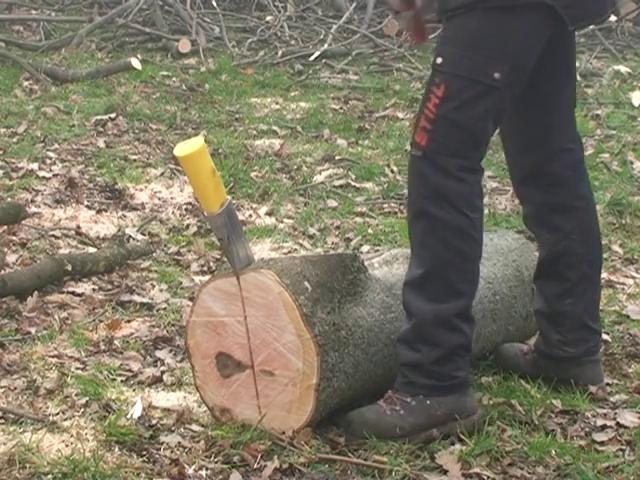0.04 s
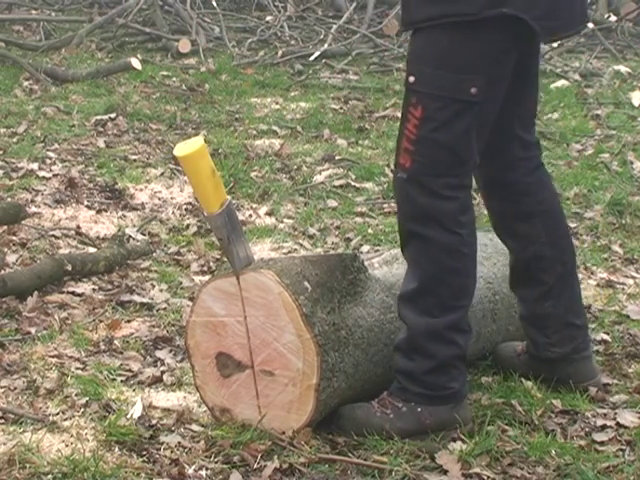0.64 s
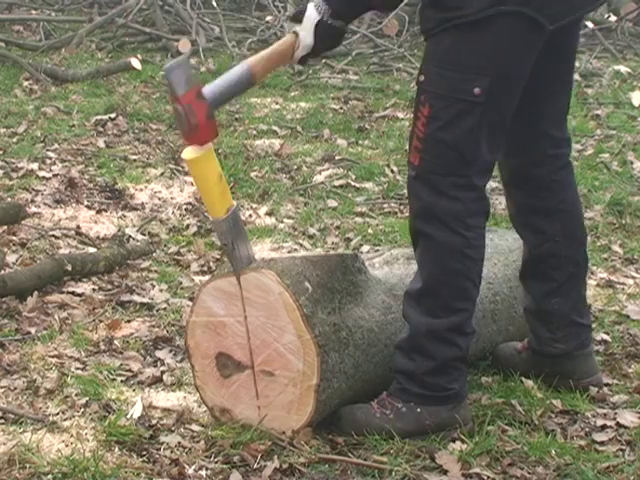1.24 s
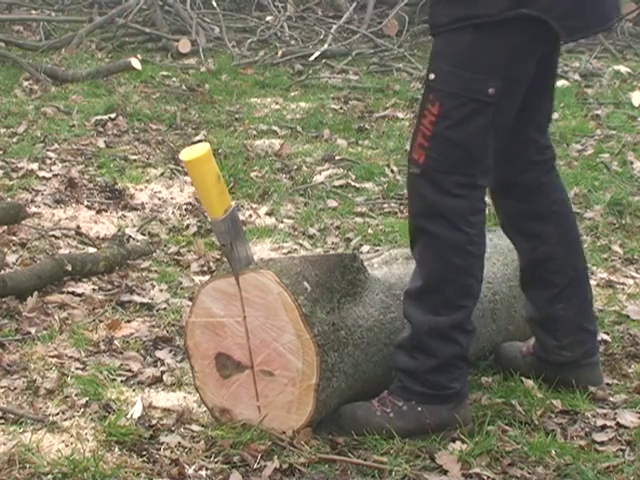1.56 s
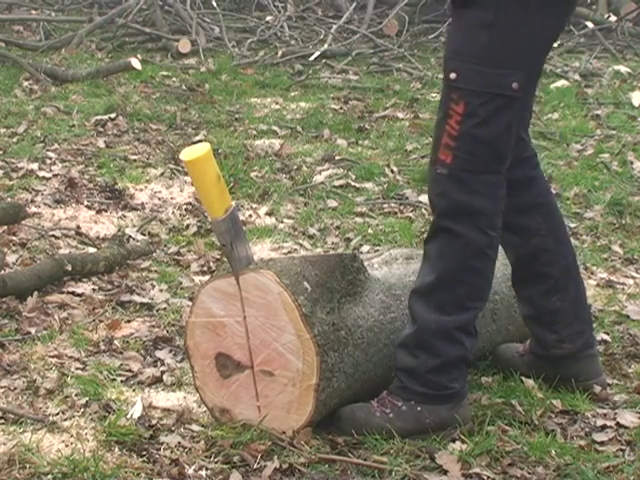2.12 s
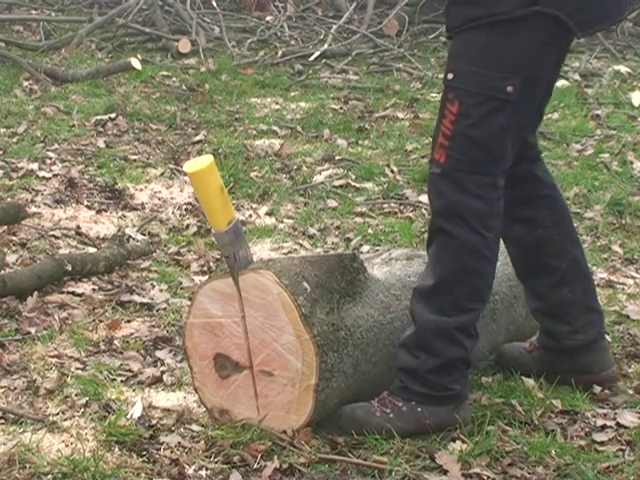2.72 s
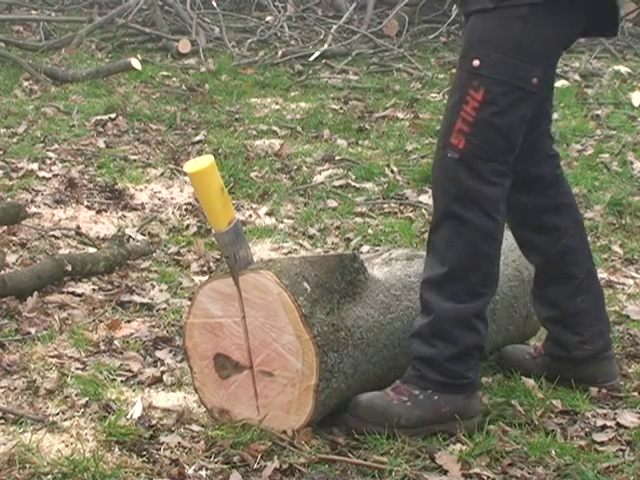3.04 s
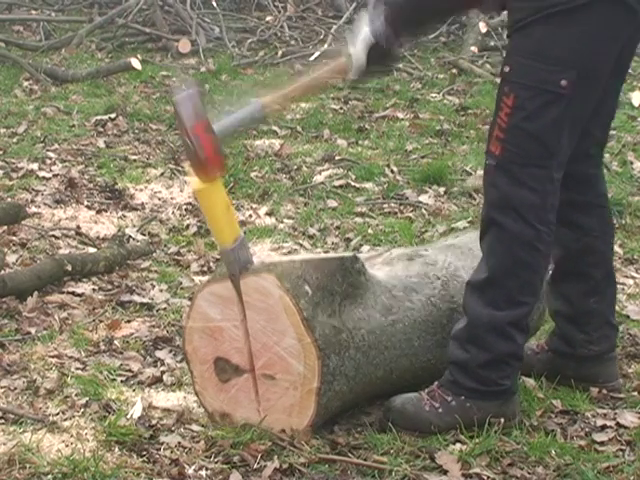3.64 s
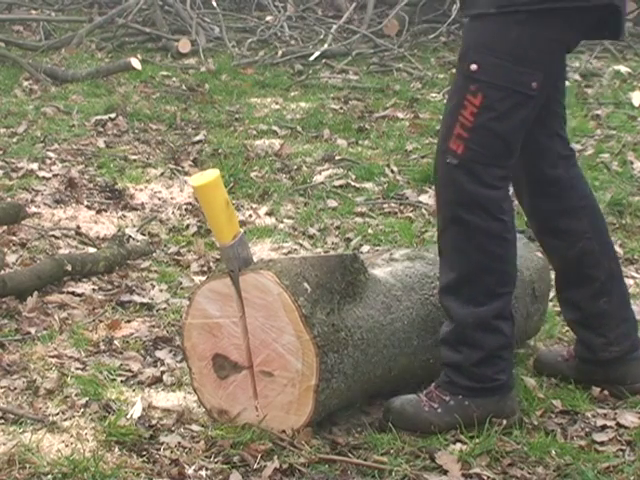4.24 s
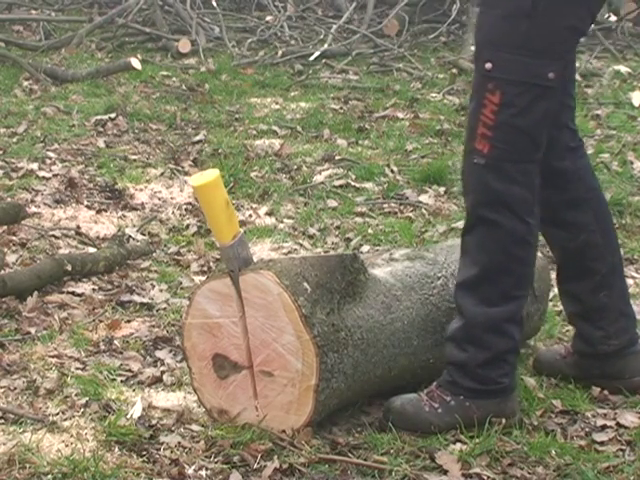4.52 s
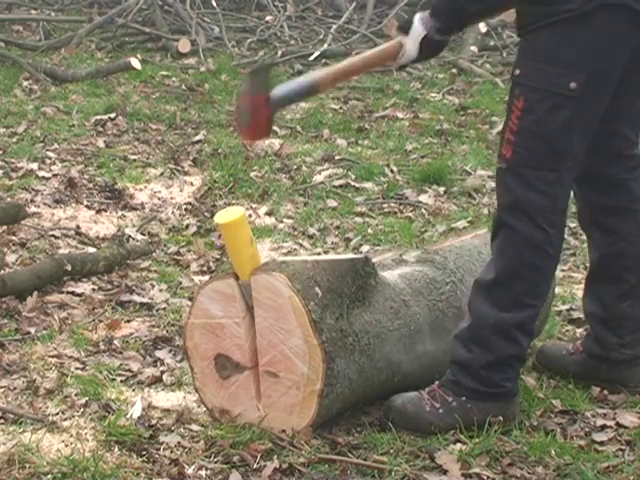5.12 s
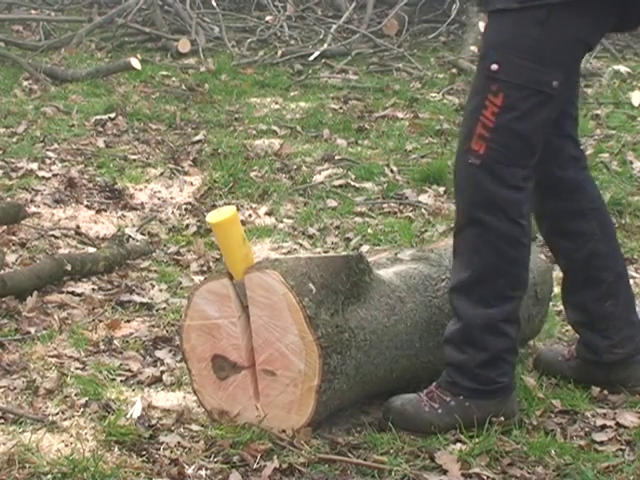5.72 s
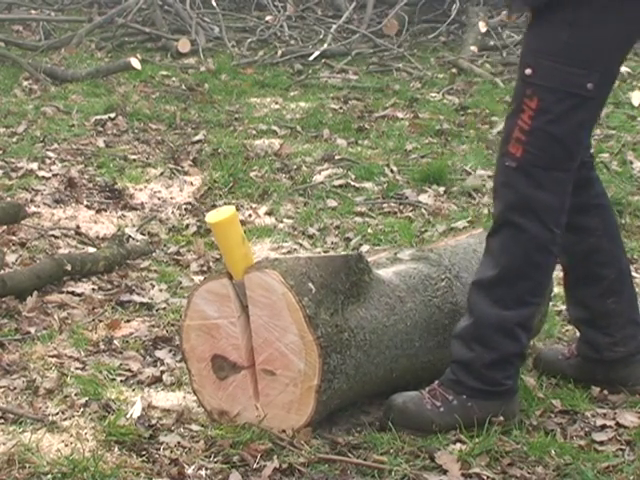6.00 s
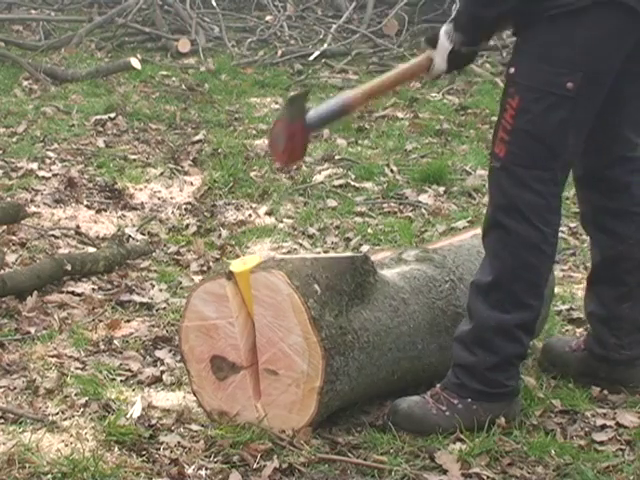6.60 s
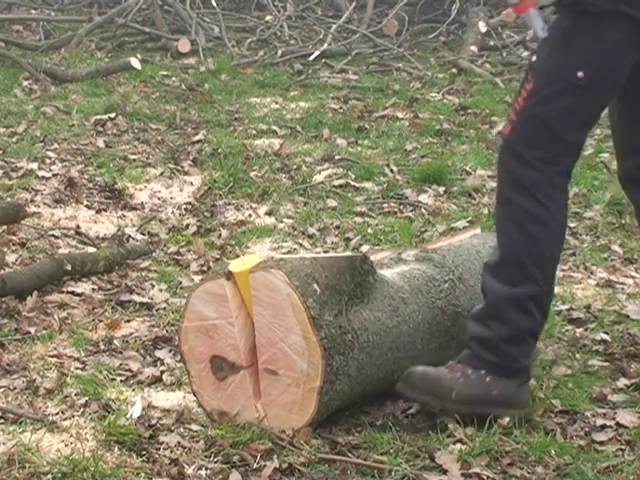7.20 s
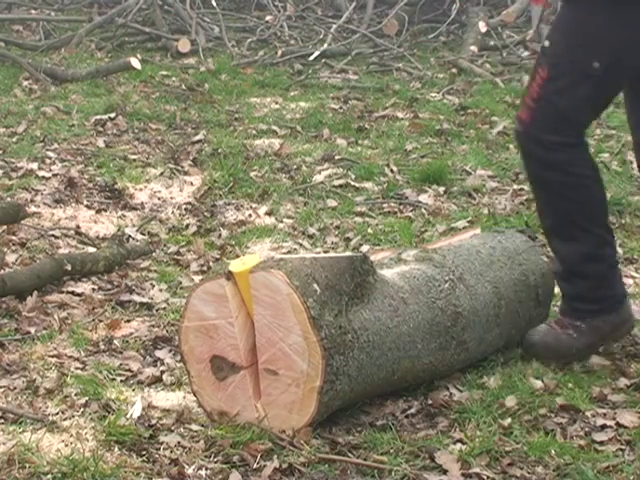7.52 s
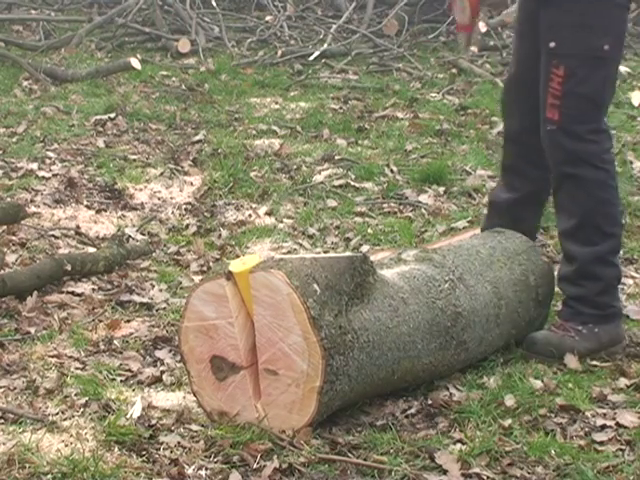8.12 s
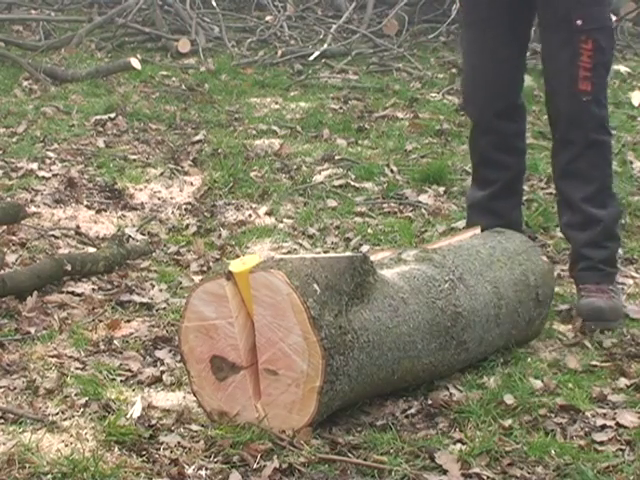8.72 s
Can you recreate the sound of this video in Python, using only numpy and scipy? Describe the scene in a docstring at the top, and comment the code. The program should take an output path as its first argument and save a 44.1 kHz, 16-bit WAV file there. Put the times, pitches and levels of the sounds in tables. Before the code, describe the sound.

At the edge of a wood, a sledgehammer hits a wedge in a log five times, a little over a second apart. Each blow is a loud steel crack with a hollow wooden ring, echoing off the trees, and clothes rustle softly with each swing. The wedge slips, then the last blow breaks the log open with a thin metallic ring. The handle knocks and boots crackle off through dry leaves. Faint traffic rumbles throughout.

```python
"""At the edge of a wood, boots take a stand in dry leaves and a strained log ticks. A sledgehammer then
drives a wedge into it five times: clothes rustle softly with each swing, steel cracks, the log rings
hollow, and the trees throw the sound back, swelling as a limiter lets go. Just before the last blow the
wedge slips; then the log breaks open and the loose wedge sings. At the end the hammer's handle knocks and
boots crackle off through the leaves, over the far traffic rumble that has been there all along."""
import sys
import numpy as np
from scipy import signal
from scipy.fft import rfft, irfft, next_fast_len
from scipy.io import wavfile

SR = 44100
rng = np.random.default_rng(int(sys.argv[2]) if len(sys.argv) > 2 else 0)


def wav_record(signal):
    """Record a signal, one row per channel, as 16-bit PCM in the file named by sys.argv[1]."""
    frames = np.transpose(np.atleast_2d(signal))
    bounded = np.clip(frames, -1, 1)
    # unit amplitude maps onto the largest positive 16-bit level
    quanta = np.round(bounded * 32767).astype(np.int16)
    wavfile.write(sys.argv[1], SR, quanta)


N = 394694
TIME = np.arange(N) / SR
SECOND = TIME[:SR]   # the clock for one short sound


# The blows: t/s, crack level/dB, crack brightness/(dB per octave), crack length/times,
# thud level/dB, groan level/dB, tearing level/dB, sharp echo against the crack/dB
BLOWS = [(1.219, 7, 1.0, 1.55, 1, -27, -22, -47), (2.4507, 13, 1.5, 0.99, 14, -21.5, -25.5, -53),
         (3.6806, 13.5, 0.52, 0.81, 17, -14.5, -34, -58), (4.9707, 15.5, 0.2, 0.99, 16.5, -8.5, -25, -48),
         (6.3239, 14.5, 0.4, 0.83, 5, -13, -41, -37.5)]
# The log's notes, one list a blow, changing as the split grows: f/Hz, level/dB, t60/s
# (t60 is the time a sound takes to fade by 60 dB)
LOG_NOTES = [
    [(299.2, -6.5, 0.31), (341, 1.5, 0.23), (428, 5, 0.23), (509, -5.5, 0.27), (575, -7.5, 0.26),
     (633, 2, 0.17), (874, -3, 0.12), (1205, -3, 0.081)],
    [(280.3, -17.5, 0.5), (399, 12.5, 0.23), (460, -3, 0.22), (673, -20, 0.2), (744, -12, 0.29)],
    [(359, 1.5, 0.3), (334.4, 5.5, 0.21), (396.4, 8, 0.13), (510, 4.5, 0.28), (572, -6, 0.26),
     (1646, 15.5, 0.021), (3250, 8.5, .02)],
    [(271, -11, 0.54), (359.7, 5, 0.22), (400, -0.5, 0.25), (439, 4, 0.18), (566, -14, 0.42),
     (975, 7.5, 0.088)],
    [(346.6, 14.5, 0.15), (396, 7, 0.22), (679, 10.5, 0.13), (780, -15.5, 0.44), (1031, 7.5, 0.12),
     (1212, 14, 0.054), (1319, 13.5, 0.056)],
]
# The dull thud of the whole log: f/Hz, relative level/dB, t60/s
THUD_NOTES = [(339.8, 0, 0.084), (467, -5.5, 0.068)]

def hammer(lowest_hz=190, tear_delay_s=0.012, thump_hz=45, thump_db=-18):
    """Each blow cracks on the wedge, tears fibres and rings the log, over a short, deep thump."""
    log, low_thump = np.zeros((2, N)), np.zeros(N)
    for blow, notes in zip(BLOWS, LOG_NOTES):
        start, crack_db, bright_db, length, thud_db, groan_db, tear_db, echo_db = blow
        thud = from_db(thud_db) * ring(THUD_NOTES, build_cycles=2.2)
        body = ring(notes) - thud + from_db(groan_db) * groan()
        add(log, start, from_db(crack_db) * crack(bright_db, length, echo_db) + body)
        add(log, start + tear_delay_s, from_db(tear_db) * tearing())
        add(low_thump, start, from_db(thump_db) * noise_hit(thump_hz, octaves=0.72, t60=0.2))
    # keep deep bass out of the crack and ring
    return filtered(log, lowest_hz, "high") + low_thump


# The tone of steel and wood cracking: f/Hz, relative level/dB, t60/s
CRACK_TONE = [(152, -15.5, 0.11), (320, 8, 0.037), (595, -1, 0.16), (1150, -0.5, 0.063),
              (1780, -1.5, 0.063), (3190, -3, 0.035), (4700, -17, 0.058), (6700, -13.5, 0.042),
              (9100, -12, 0.023), (13400, -18, 0.0058)]
# How alike the two ears hear sound among the trees: f/Hz, likeness/(0 to 1)
WOOD_LIKENESS = [(300, 1), (800, 0.83), (2000, 0.63), (5000, 0.12), (9000, 0.1), (13000, 0.28)]

def crack(bright_db, length, echo_db, uneven_db=2.5):
    """Many crowded notes die fast, then come back unevenly from the trees and once as a sharp echo."""
    out, power = 0, 0
    trunks = from_db(uneven_db * drift(44.7, size=SR))
    for hz, noise in bands(SR, WOOD_LIKENESS, ripple_db=6.5):
        band = noise * from_db(at_hz(CRACK_TONE, hz) + bright_db * np.log2(hz / 1500))
        dying = fade(length * at_hz(CRACK_TONE, hz, column=2))
        direct = band[0, ::-1] * dying   # reversed noise: same tone as the scatter, unrelated wave
        scattered = band * np.sqrt(np.sum(dying ** 2) * forest(hz))
        echo = from_db(echo_db) * delayed(direct, ECHO_S)
        out = out + direct + echo + scattered * trunks
        power += np.var(band)
    return out / np.sqrt(power)


def groan(start_hz=235, sink_s=0.2405, t60=0.43, build_s=0.025, rough_db=3):
    """A rough low note swells and sinks after each blow."""
    pitch_hz = start_hz * np.exp(-SECOND / sink_s)
    roughness = from_db(rough_db * drift(62, size=SR))
    return glide(pitch_hz) * rise(build_s) * fade(t60) * roughness


def tearing(hz=2100, top_hz=8500, length_s=0.088):
    """Parting fibres make a short run of tiny clicks, dulled by the wood around them."""
    dull = filtered(clicks(SR, per_s=4000, spread_db=3.5), top_hz, "low")
    return resonance(dull, hz, octaves=1.77) * np.exp(-(SECOND / length_s) ** 2)


# Fibres breaking right through the log: f/Hz, width each way/octaves, relative level/dB, t60/s
BREAK_BURST = [(1040, .55, -1, 0.021), (7000, 0.56, -21.5, .014)]

def breaking(start_s=6.3566, db=14.8):
    """The log breaks open under the last blow."""
    return placed(start_s, db, burst(BREAK_BURST))


# Strained wood and twigs: t/s, relative level/dB, f/Hz
SNAPS = [(0.071, -34, 1940), (0.7372, -33, 8090), (2.3171, -30.5, 5750), (4.4838, -22.5, 2750),
         (5.7179, -28, 1720), (6.0272, -33, 2850), (6.0628, -19.5, 3430), (6.1434, -26.5, 3120),
         (7.5522, -33.5, 1710), (7.669, -30, 4340)]

def snapping(trim_db=-5.5):
    """Wood gives way in tiny snaps, each a very short puff of noise."""
    return sum(placed(start, db + trim_db, noise_hit(hz, octaves=0.92, t60=0.016))
               for start, db, hz in SNAPS)


# The wedge's own notes: f/Hz, relative level/dB, t60/s
WEDGE_NOTES = [(587, -3, 0.094), (770, -9, 0.1), (1087, -5, 0.059), (1610, 7.5, 0.017), (2855, 9, 0.025),
               (3600, 7, 0.015)]
# Fibres breaking around the wedge: f/Hz, width each way/octaves, relative level/dB, t60/s
SLIP_BURST = [(3070, 1.27, 5.5, 0.019)]

def slipping(start_s=5.936, db=-19):
    """The wedge slips in the split: it rings, clacks and breaks a few fibres."""
    return placed(start_s, db, ring(WEDGE_NOTES) + clack() + burst(SLIP_BURST))


# A short ping, then a long one at the last blow: t/s, level/dB, t60/s
PINGS = [(6.143, -36.5, 0.056), (6.3243, -32.5, 1.08)]

def singing(hz=3200):
    """The loose wedge rings: steel notes lie so close together that they waver."""
    return sum(placed(start, db, noise_hit(hz, octaves=0.06, t60=t60)) for start, db, t60 in PINGS)


# Knocks on the hammer's handle: t/s, level/dB
KNOCKS = [(6.9675, -34), (7.668, -52)]
# The handle's own notes: f/Hz, relative level/dB, t60/s
HANDLE_NOTES = [(694, 7, 0.093), (850, 3, 0.1), (1160, 10, 0.067), (1560, -2, 0.065), (1910, -1, 0.068),
                (3190, -6, 0.088)]

def knocking():
    """The handle knocks as it is caught and carried off."""
    return sum(placed(start, db, ring(HANDLE_NOTES) + clack()) for start, db in KNOCKS)


def clack(hz=1030, db=-5):
    """The short, pitchless noise of a knock on wood."""
    return from_db(db) * noise_hit(hz, octaves=1.5, t60=0.077)


# What comes back: f/Hz, near trunks/dB, far trees/dB, blurred echo/dB, brush pile/dB
FOREST_RETURNS = [(146, -6, -15, -48, -32), (380, -3.5, -23, -34.5, -32), (1140, -15, -26, -37.5, -22.5),
                  (3230, -13, -29.5, -36.5, -24.5), (4700, -13.5, -26, -46, -21),
                  (7700, -6.5, -25.5, -53, -28), (13300, -33, -56, -52, -60)]
ECHO_S, BRUSH_PILE_S = 0.222, 0.072   # how late each one answers

def forest(hz, build_s=0.0041):
    """Power coming back per sample: near trunks fade fast, far trees slowly, two answers come late."""
    build = rise(build_s)
    near = fade(t60=0.3) * build
    far = fade(t60=1.304) * build
    echo = delayed(fade(t60=0.58), ECHO_S)
    brush_pile = delayed(fade(t60=0.35) * build, BRUSH_PILE_S)
    return sum((from_db(at_hz(FOREST_RETURNS, hz, column)) * unit_level(shape)) ** 2
               for column, shape in enumerate((near, far, echo, brush_pile), start=1)) / SR


def tree_echoes(sound):
    """The trees scatter a sound into a fading stereo tail."""
    tail = sum(noise * np.sqrt(forest(hz)) for hz, noise in bands(SR, WOOD_LIKENESS))
    return signal.fftconvolve(sound[None], tail, axes=1)[:, :N]


# The rustle of clothes and dry leaves: f/Hz, relative level/dB
RUSTLE_TONE = [(500, -4), (1600, 17), (2500, 12), (3300, 15.5), (5500, 5.5), (8200, 13.5), (13400, -11.5)]
# How alike the two ears hear rustles and open air: f/Hz, likeness/(0 to 1)
AIR_LIKENESS = [(100, 1), (500, 0.88), (1200, 0.61), (3000, 0.66), (8000, 0.48), (13000, 1)]

def rustling(swing_crackle_db=-9, step_crackle_db=-1):
    """Clothes rustle softly with each swing; steps crackle in dry leaves."""
    rustle = shaped_noise(RUSTLE_TONE, flicker_db=1.6, flicker_per_s=25)
    ticks = clicks(N, per_s=800, spread_db=4.5) * from_db(3 * drift(40))
    crackle = resonance(ticks, hz=7400, octaves=0.7)
    swings = swinging() * unit_level(rustle + from_db(swing_crackle_db) * crackle)
    steps = stepping() * unit_level(rustle + from_db(step_crackle_db) * crackle)
    return swings + steps


# Lifting the hammer, one row a blow: time before the blow/s, level/dB
LIFTS = [(0.41, -50.5), (.57, -47.5), (0.49, -49), (0.56, -54), (0.54, -55.5)]

def swinging(rest_db=-65, down_vs_crack_db=-66):
    """How hard clothes rub: a swell going up, another coming down, more for a harder blow."""
    motion = from_db(rest_db)
    for (start, crack_db, *_), (lead_s, lift_db) in zip(BLOWS, LIFTS):
        up = from_db(lift_db) * swell(start - lead_s, half_s=0.11)
        down = from_db(crack_db + down_vs_crack_db) * swell(start - 0.09, half_s=0.12)
        motion = motion + up + down
    return motion


# Boots taking a stand and later walking off: t/s, length/s, level/dB
STEPS = [(0.165, 0.071, -58), (6.68, 0.14, -53), (7.02, 0.17, -55), (7.227, 0.081, -47.5),
         (7.48, 0.17, -54.5), (8.092, 0.1, -52), (8.326, 0.093, -45.5), (8.473, 0.14, -44.5)]

def stepping(press_s=0.031, release_s=0.066):
    """How hard a boot presses the leaves: it comes down, stays, then eases off."""
    motion = np.zeros(N)
    for start, length, db in STEPS:
        press = np.clip((TIME - start) / press_s, 0, 1)
        release = np.exp(-np.maximum(TIME - start - length, 0) / release_s)
        motion += from_db(db) * press * release
    return motion


# The tone of open air and far traffic: f/Hz, relative level/dB
AIR_TONE = [(25, -23), (50, -2), (85, -5.5), (130, -4.5), (190, -21), (290, -18), (550, -19.5),
            (750, -25.5), (1200, -25), (2500, -37), (4500, -39.5), (8000, -37.5), (11000, -50.5),
            (16000, -66)]

def far_traffic(air_db=-40, hum_hz=114, hum_db=-48, waver_hz=5):
    """Traffic rumbles far off in the open air, with a wavering engine hum."""
    air = shaped_noise(AIR_TONE, flicker_db=-0.06, flicker_per_s=6)
    hum = glide(hum_hz + waver_hz * drift(20)) * from_db(3.5 * drift(8))
    return from_db(air_db) * air + from_db(hum_db) * unit_level(hum)


def ring(notes, build_cycles=1.56):
    """A struck thing's notes: pure tones that build up and die, every other one upside down."""
    return sum((-1) ** k * from_db(db) * np.sin(2 * np.pi * hz * SECOND)
               * rise(build_cycles / hz) * fade(t60) for k, (hz, db, t60) in enumerate(notes))


def burst(rows):
    """Breaking wood: broad bands of noise that die almost at once."""
    return sum(from_db(db) * noise_hit(hz, octaves, t60) for hz, octaves, db, t60 in rows)


def noise_hit(hz, octaves, t60):
    """Noise around one pitch that starts suddenly and fades."""
    return resonance(rng.standard_normal(SR), hz, octaves) * fade(t60)


def clicks(size, per_s, spread_db):
    """Random clicks, a few much stronger than the rest."""
    strengths = from_db(spread_db * np.minimum(rng.exponential(1, size), 4))
    return unit_level(strengths * rng.choice([-1, 1], size) * (rng.random(size) < per_s / SR))


def shaped_noise(tone, flicker_db, flicker_per_s):
    """Stereo noise that follows a tone table, each band's level wandering on its own."""
    return unit_level(sum(noise * from_db(at_hz(tone, hz) + flicker_db * drift(flicker_per_s))
                          for hz, noise in bands(N, AIR_LIKENESS)))


def bands(size, likeness, ripple_db=0, ripple_hz=60):
    """Stereo noise in half-octave slices, as (f/Hz, noise); a ripple stands for crowded notes."""
    edges = 22 * 2 ** np.arange(0, 10, .5)
    length = next_fast_len(size + SR)
    bin_hz = np.arange(length // 2 + 1) * SR / length
    ripple = np.interp(bin_hz / ripple_hz, np.arange(SR), rng.uniform(-0.64, 1, SR))
    ripple /= 1 + (bin_hz / 3500) ** 2   # high notes overlap and even out
    spectrum = rfft(rng.standard_normal((2, 2, length)))
    noise = irfft(spectrum * unit_level(from_db(ripple_db * ripple)), length)
    for k, (low, high) in enumerate(zip(edges, edges[1:])):
        shared, side = filtered(noise[k % 2], [low, high], "band")[:, -size:]
        hz = np.sqrt(low * high)
        alike = np.clip(at_hz(likeness, hz), 0, 1)
        yield hz, np.sqrt((1 + alike) / 2) * shared + np.sqrt((1 - alike) / 2) * side * [[1], [-1]]


def resonance(sound, hz, octaves):
    """Keep what lies within some octaves of a pitch, at level 1."""
    edges = np.clip([hz / 2 ** octaves, hz * 2 ** octaves], 20, .45 * SR)
    return unit_level(filtered(sound, edges, "band"))


def filtered(sound, hz, keep):
    """Gently keep the lows, the highs or a band."""
    return signal.sosfilt(signal.butter(2, hz, keep, fs=SR, output="sos"), sound)


def glide(hz):
    """A pure tone with a moving pitch."""
    return np.sin(2 * np.pi * np.cumsum(hz) / SR)


def drift(per_s, size=N):
    """A random wander, about 1 either way."""
    return np.interp(TIME[:size] * per_s, np.arange(size), rng.standard_normal(size))


def rise(build_s):
    """Climb from 0 towards 1."""
    return 1 - np.exp(-SECOND / build_s)


def fade(t60):
    """Fall by 60 dB every t60 seconds."""
    return np.exp(-np.log(1000) * SECOND / t60)


def swell(peak_s, half_s):
    """A smooth rise and fall."""
    return np.exp(-((TIME - peak_s) / half_s) ** 2)


def delayed(sound, delay_s):
    """Start a one-second sound later."""
    return np.interp(SECOND - delay_s, SECOND, sound, left=0)


def add(track, start_s, sound):
    """Mix a sound in at a time."""
    start = round(start_s * SR)
    track[..., start:start + sound.shape[-1]] += sound[..., :N - start]


def placed(start_s, db, sound):
    """One sound on an otherwise silent track."""
    track = np.zeros(N)
    add(track, start_s, from_db(db) * sound)
    return track


def at_hz(rows, hz, column=1):
    """Read a table between its rows, by pitch."""
    table = np.array(rows)
    return np.interp(np.log(hz), np.log(table[:, 0]), table[:, column])


def unit_level(sound):
    """Scale to an average (rms) level of 1."""
    return sound / np.sqrt(np.mean(sound ** 2) + 1e-20)


def from_db(db):
    """Turn decibels into a multiplier."""
    return 10 ** (np.asarray(db) / 20)


def scene(echoes_db=-7, pan_db=0.25):
    """The log lies almost straight ahead, with the trees all round."""
    wood = snapping() + slipping() + breaking() + knocking()
    log = (hammer() + singing() + wood) * from_db([[-pan_db], [pan_db]])
    return log + from_db(echoes_db) * tree_echoes(wood) + rustling() + far_traffic()


def record(dry, overload_db=20, ceiling_db=-1.88, release_db_per_s=270, soften_hz=14000, top_hz=16000):
    """Cracks overload the input; a limiter turns down at once and soon recovers; the top treble is cut."""
    driven = from_db(overload_db) * np.tanh(dry / from_db(overload_db))
    peak_db = 20 * np.log10(np.abs(driven).max(axis=0) + 1e-9)
    over_db = np.maximum(peak_db - ceiling_db, 0)
    recovery_db = release_db_per_s * TIME
    dip_db = np.maximum.accumulate(over_db + recovery_db) - recovery_db
    soft = filtered(driven * from_db(-dip_db), soften_hz, "low")
    return signal.sosfilt(signal.ellip(10, .1, 90, top_hz, fs=SR, output="sos"), soft)


dry = scene()
out = record(dry)
wav_record(out)
```